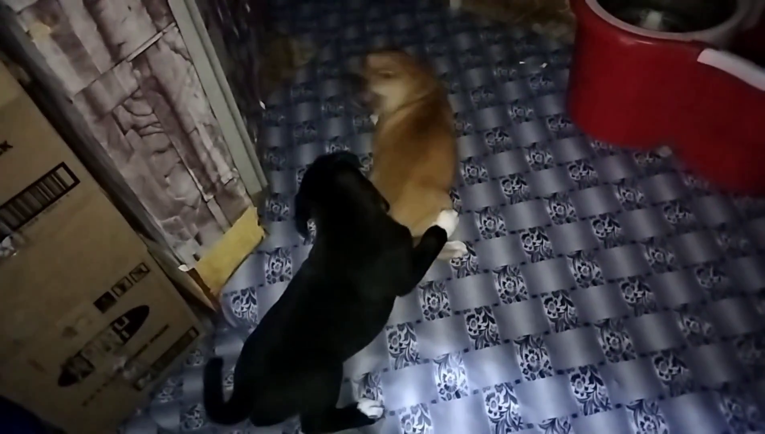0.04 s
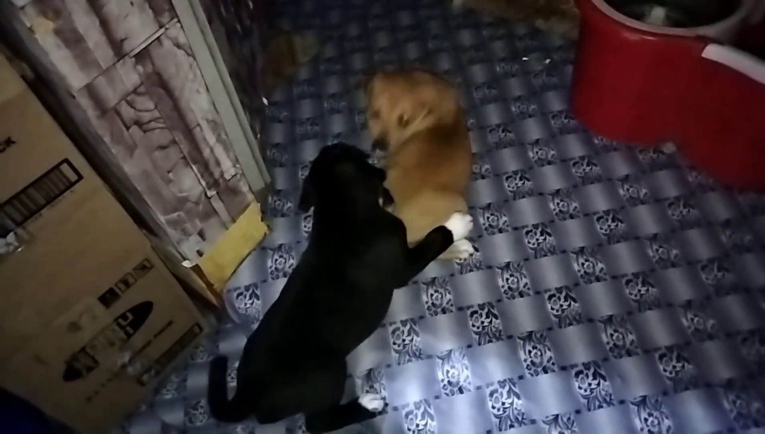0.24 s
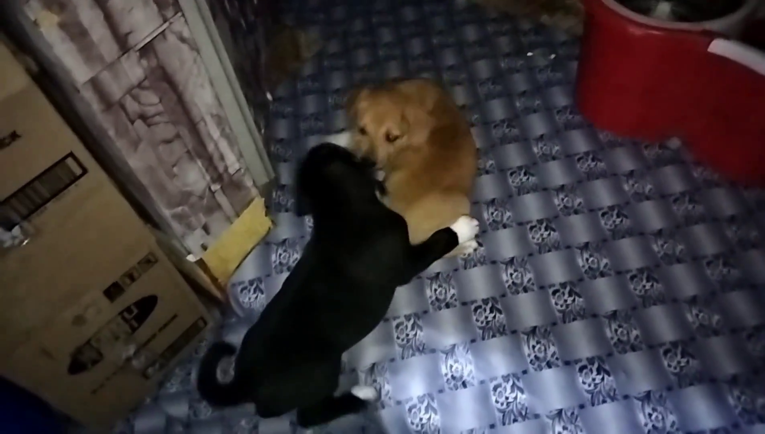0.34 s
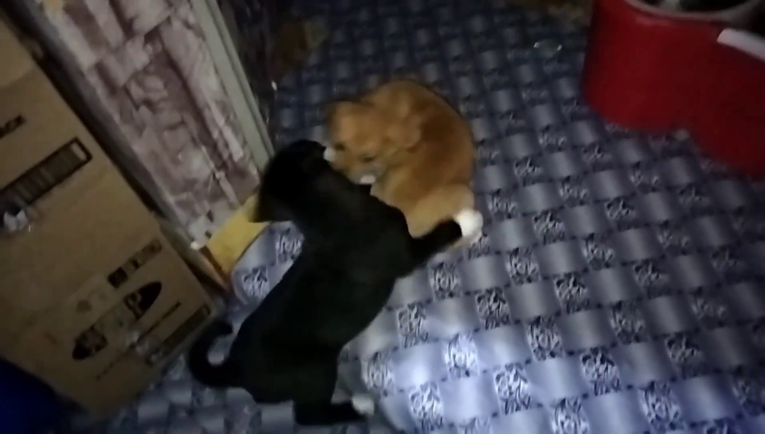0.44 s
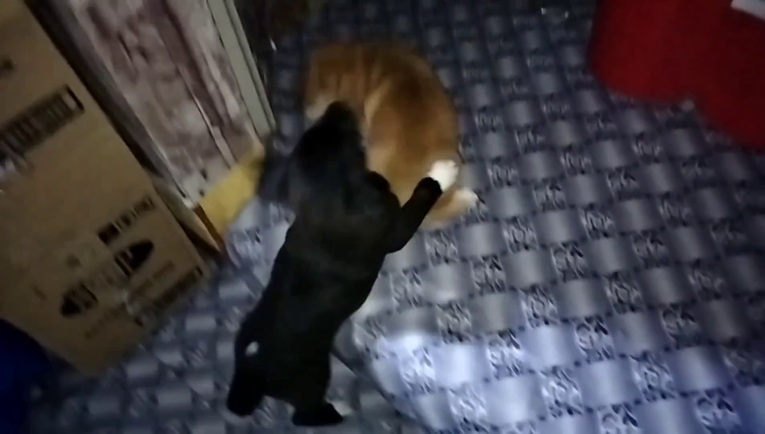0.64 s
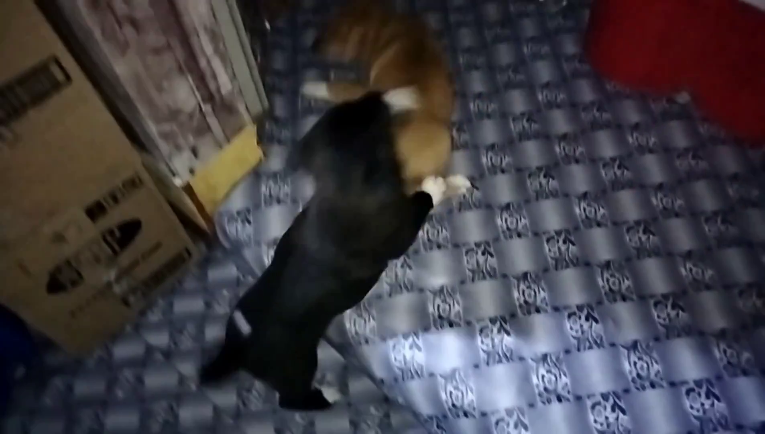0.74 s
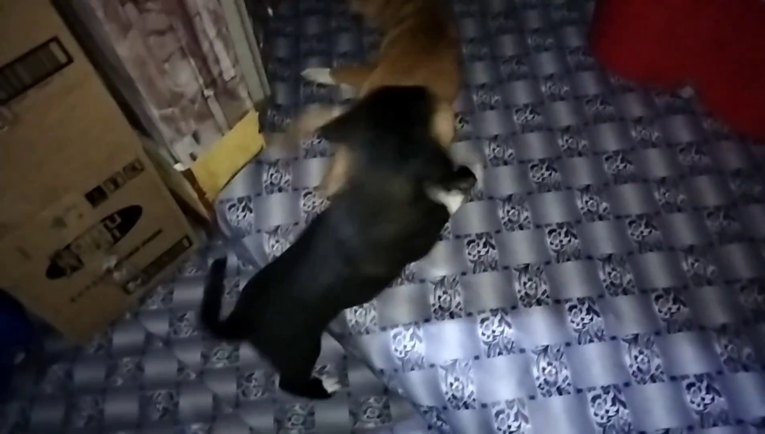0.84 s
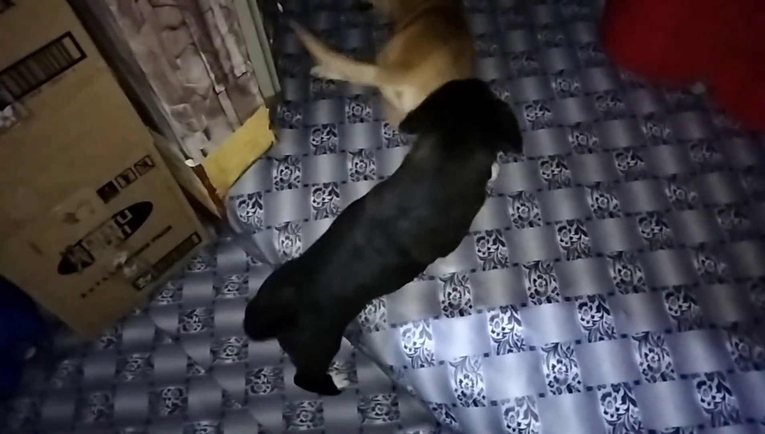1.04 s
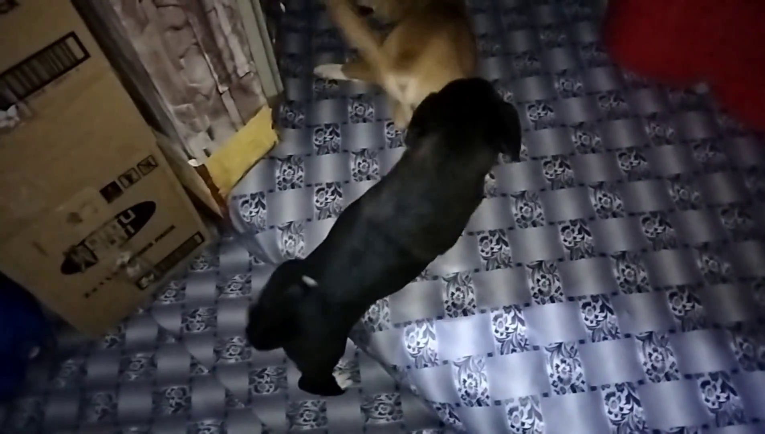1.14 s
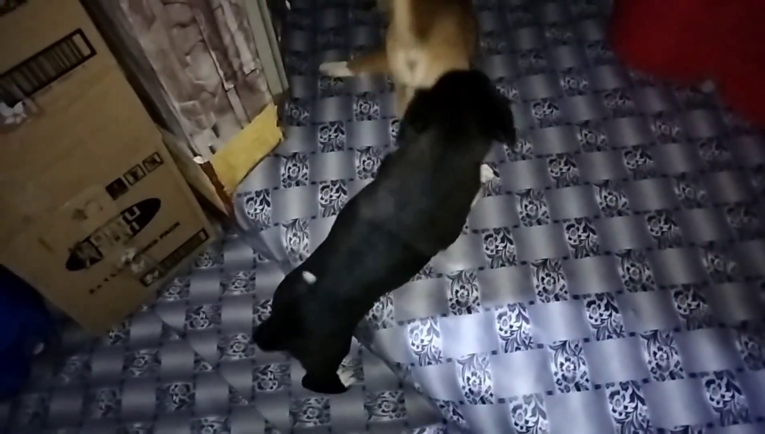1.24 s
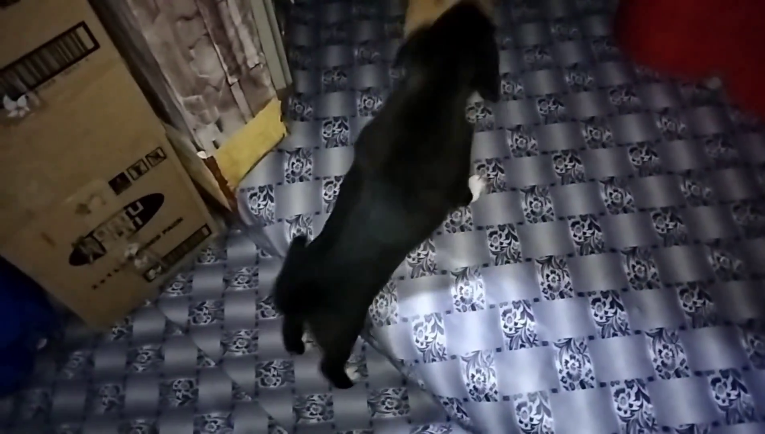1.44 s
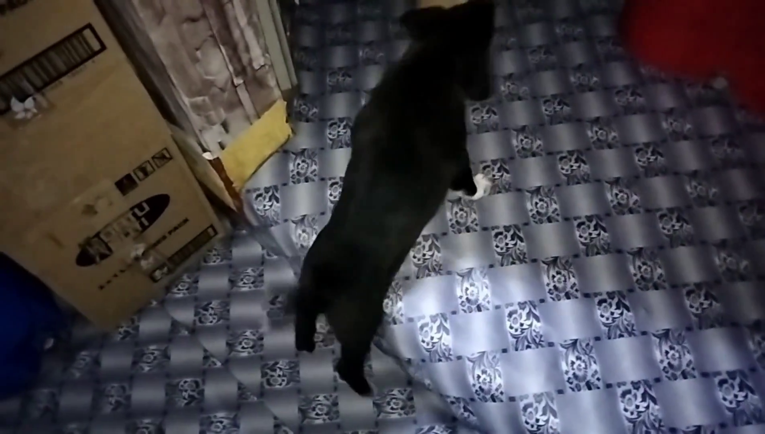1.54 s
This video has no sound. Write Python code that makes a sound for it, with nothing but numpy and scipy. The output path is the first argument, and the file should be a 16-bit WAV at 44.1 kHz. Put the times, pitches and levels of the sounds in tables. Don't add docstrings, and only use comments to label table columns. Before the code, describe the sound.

A dog's sharp hoarse yip bursts out at 0.2 s, rising into a squeak and gone by 0.33 s. A quick snort leads into a low, rattling growl from 0.5 to 0.8 s with wet throat clicks. A small grunt and puffs follow at 0.85 s, then a softer fluttering growl at 1.0-1.25 s. Brief breathy snorts or scuffs come near 1.4 s, over faint room hum, rumble and hiss.

```python
import sys
import numpy as np
from scipy import signal
from scipy.fft import rfft, irfft, next_fast_len
from scipy.io import wavfile
from scipy.ndimage import map_coordinates

SR = 44100
rng = np.random.default_rng(int(sys.argv[2]) if len(sys.argv) > 2 else 0)


def magnitude_from_level(level_db):
    exponent = np.asarray(level_db, float) / 20
    return 10 ** exponent


def bounce(signal):
    frames = np.transpose(np.atleast_2d(signal))
    limited = np.clip(frames, -1, 1)
    pcm = np.round(limited * 32767).astype(np.int16)
    wavfile.write(sys.argv[1], SR, pcm)


N = 70560
T = np.arange(N) / SR

# frequency in Hz, rms level in dB.
HUM_PARTIALS = [(59.5, -60), (119.5, -62.5)]
# time in seconds, level in dB.
RUMBLE_LEVEL = [(0, -59), (.45, -52.5), (.6, -49), (1, -53), (1.4, -51.5), (1.6, -63)]
# frequency in Hz, density in dB per Hz.
RUMBLE_SPECTRUM = [(10, 0.5), (25, -18), (45, 0.5), (100, -17), (200, -57), (400, -55)]
HISS_SPECTRUM = [(60, -8.5), (130, 0), (800, -5), (2700, -13), (5400, -22), (8000, -15), (10000, -22),
                 (12400, -45)]
# frequency in Hz, t60 in seconds.
ROOM_DECAY = [(200, 0.17), (1000, 0.22), (2500, 0.31), (5000, 0.1), (10000, 0.19)]
# frequency in Hz, gain in dB.
MIC_RESPONSE = [(30, -1), (9800, 0), (11000, -3.5), (12400, -7.5)]
# start in seconds, length in seconds, level in dB, low band in dB.
SNORT_PUFFS = [(0, 0.011, -59.5, -2), (0.354, 0.025, -59.5, 5), (0.4216, 0.0039, -52, -0.5),
               (0.487, 0.012, -45, -7.5), (0.505, 0.0096, -42, -11.5), (0.52, 0.015, -56.5, 5.5),
               (0.83, 0.0016, -48.5, -6), (0.834, 0.021, -55, -3.5), (0.868, 0.026, -47.5, -0.5),
               (0.888, 0.059, -50, -5), (0.956, 0.032, -50, -9), (1.333, 0.0074, -58, -6),
               (1.44, 0.027, -68, 3), (1.514, 0.007, -62, 1), (1.551, 0.0093, -59.5, -6),
               (1.563, 0.014, -57.5, -2.5)]
# start in seconds, length in seconds, level in dB, low band in dB.
SWELLING_PUFFS = [
    (1.358, 0.027, -43.5, -16.5),
    (1.39, 0.016, -50, -2.5),
    (1.404, 0.018, -40.5, -11.5),
]
# frequency in Hz, width in Hz, level in dB.
NOSE_HIGH_BAND = [(6750, 1880, -6), (8100, 1220, -1.5), (9440, 1080, 0.5)]
NOSE_LOW_BAND = [(1210, 1660, -2.5), (2950, 1400, -6), (4060, 860, 4.5)]
# time in seconds, peak in dB, pitch in Hz, t60 in seconds.
PALATE_SLAPS = [(.555, -36, 1090, .04), (0.5895, -27.5, 1290, .015), (0.599, -31, 1310, 0.011),
                (.6, -40, 6150, .01), (0.614, -34, 6300, 0.0083), (0.6588, -30, 1260, 0.016),
                (.671, -35, 1370, .02), (.681, -21.5, 1300, 0.013), (.681, -28.5, 6660, 0.014),
                (0.6939, -21.5, 1116, 0.02), (0.7042, -22, 1350, 0.014), (0.7107, -24.5, 1413, 0.023),
                (0.71, -22.5, 6930, .01), (0.729, -29, 1114, 0.031), (0.8418, -42.5, 1450, 0.03),
                (.8725, -39.5, 3970, 0.032), (.888, -31.5, 9200, 0.0087), (1.0171, -39.5, 1500, 0.023),
                (1.051, -39.5, 1500, 0.025), (1.124, -39, 1320, 0.019), (1.146, -35.5, 1522, 0.027),
                (1.146, -39, 3950, 0.017), (1.183, -35, 1450, .018), (1.201, -48, 1500, .015),
                (1.203, -52, 3950, 0.014)]
# time in seconds, pitch in Hz, level in dB.
CHEST_TONE_1 = [(.52, 180.9, -53), (.552, 213.4, -46.5), (.58, 215.3, -47), (.62, 202, -53),
                (.658, 220.1, -46), (.7, 223, -46), (.725, 224.5, -57)]
CHEST_TONE_2 = [(1.005, 165, -60), (1.028, 172, -50), (1.048, 178, -49), (1.088, 192, -51),
                (1.118, 195, -47), (1.16, 196, -51), (1.212, 191, -52), (1.235, 190, -61)]
# time in seconds, level in dB, pitch in Hz, roughness from 0 to 1.
FIRST_GROWL = [(.515, -48.5, 180.3, 0.47), (.532, -39.5, 201.4, 0.09), (.556, -35.5, 212.6, 0.52),
               (.6, -36.5, 215, 0.77), (.636, -37, 179.7, 0.55), (.68, -35, 190, 0.46),
               (.73, -36.5, 204.8, 0.43), (.775, -42, 171.9, 0.76), (.8, -58.5, 166, 0.68)]
SECOND_GROWL = [(.995, -49, 174.6, 0.42), (1.02, -46.5, 179.6, 1), (1.056, -42, 190, 0.66),
                (1.12, -41, 201.5, 0.33), (1.182, -42.5, 215, 0.39), (1.215, -42.5, 214, 0.33),
                (1.235, -51, 202.9, 1), (1.26, -59, 190, 0.97)]
GRUNT_BETWEEN = [
    (.834, -60, 171.3, 0.57),
    (.84, -42.5, 174.8, 0.97),
    (.855, -51.5, 166, 0.57),
    (.875, -50, 172.8, 0.48),
    (.93, -53, 167, 0.85),
    (.99, -52.5, 173.3, 0.64),
    (1.0, -41, 169, 0.62),
]
# start in Hz, end in Hz, width in Hz, level in dB, change in dB.
FIRST_THROAT = [(215, 250, 160, 0, -12.5), (410, 350, 190, -4.5, 10.5), (650, 485, 260, -0.5, -13.5),
                (1090, 960, 210, -1.5, 1.5), (1105, 1543, 163, 5.5, -3.5), (1500, 1570, 300, -8, 8),
                (2790, 2850, 510, -3.5, -15.5), (3680, 3500, 480, -7.5, -1.5), (4130, 4500, 1930, -17, 1.5),
                (6300, 6800, 370, -18, 18.5), (8000, 8530, 1170, -16.5, 7)]
SECOND_THROAT = [(371, 233, 138, 3, 1.5), (600, 385, 427, -4, 5.5), (1450, 1690, 450, -6.5, 3),
                 (3020, 2720, 940, -8.5, -0.5), (3950, 3930, 260, -14, 13.5),
                 (4440, 4400, 610, -21.5, 10.5), (7240, 7800, 1020, -17.5, 11),
                 (8840, 9700, 1000, -10.5, -6)]
GRUNT_THROAT = [(190, 185, 160, 0.5, 0), (320, 316, 110, 6.5, 5.5), (1470, 1840, 370, 2.5, -7),
                (2964, 4400, 1100, -7.5, -11)]
# time in seconds, level in dB, squeak pitch in Hz, squeak share in dB.
YIP_COURSE = [
    (0.1888, -50, 1500, -8),
    (0.1922, -38, 1488, -0.5),
    (0.205, -29.5, 1539, -26),
    (0.209, -24, 1496, -12),
    (.224, -20, 1658, -2.5),
    (0.237, -18.5, 1974, 0.5),
    (0.264, -19.5, 1975, -4),
    (0.284, -25.5, 2150, -17),
    (0.33, -49, 2150, -25),
]
# start in Hz, end in Hz, width in Hz, level in dB, change in dB.
YIP_RESONANCES = [(224, 260, 120, -14.5, -12), (380, 426, 75, -6, 13), (700, 776, 77, -23, -37),
                  (1340, 1740, 820, -1, 5), (1860, 2090, 324, 6, -1), (3180, 2350, 460, 1, 4),
                  (3580, 3210, 260, -0.5, -1), (3730, 4250, 770, -3, 0.5), (6060, 8080, 1230, -22, 18.5),
                  (9200, 11100, 850, 1.5, -29)]
# frequency in Hz, gain in dB.
YIP_LOW_CUT = [(50, -18), (250, -10.5), (720, -6.5), (950, -9), (1250, -4)]
# time in seconds, boost in dB.
FOLD_JOLTS = [(.2075, 5), (.2255, 7), (.234, 5), (.241, 5), (.2495, 5), (.255, 4), (.2605, 6), (.267, 2)]


def unit(x):
    return x / np.sqrt(np.mean(x ** 2) + 1e-20)


def along(points, hz):
    f, v = np.transpose(points)
    return np.interp(np.log(hz + 1), np.log(f + 1), v)


def curves(rows):
    s, *columns = np.transpose(rows)
    return [np.interp(T, s, column) for column in columns]


def wobble(rate_hz):
    knots = rng.standard_normal(int(N * 1000 / SR) + 4)
    return map_coordinates(knots, [T * rate_hz])


def coloured(x, points):
    size = next_fast_len(N + 8192)
    gain = magnitude_from_level(along(points, np.fft.rfftfreq(size, 1 / SR)))
    return irfft(rfft(x, size) * gain, size)[..., :N]


def shaped(x, level_db, rows):
    on = (T > rows[0][0]) & (T < rows[-1][0])
    return on * magnitude_from_level(level_db) * x / np.sqrt(np.mean(x[on] ** 2))


def throat(x, resonances, start_s, end_s):
    part = (T > start_s - 0.02) & (T < end_s + 0.06)
    glide = np.clip((T[part] - start_s) / (end_s - start_s), 0, 1)
    out = np.zeros(N)
    for k, (from_hz, to_hz, width_hz, db, change_db) in enumerate(resonances):
        turn = np.exp(2j * np.pi * np.cumsum(from_hz + (to_hz - from_hz) * glide) / SR)
        pole = np.exp(-np.pi * width_hz * 1.5 / SR)
        smooth = signal.lfilter([(1 - pole) ** 2], [1, -2 * pole, pole ** 2], x[part] / turn)
        out[part] += (-1) ** k * magnitude_from_level(db + change_db * glide) * (smooth * turn).real
    return out


def folds(pitch_hz, rough, jitter, top_hz, weak=1, scatter_db=0.5, flutter_db=0, gate=2.85):
    cycles = np.cumsum(pitch_hz * (1 + jitter * wobble(150))) / SR
    whole = np.floor(cycles).astype(int)
    scatter = magnitude_from_level(scatter_db * np.clip(rng.standard_normal(2000), -2, 2))
    size = scatter[whole] * np.where(whole % 2, weak, 1)
    clicks = unit(np.diff(whole, prepend=0) * size)
    pulses = signal.lfilter(*signal.butter(3, top_hz, fs=SR), clicks)
    breath = unit(size * magnitude_from_level(flutter_db) * np.exp(-gate * (cycles % 1)) * rng.standard_normal(N))
    rough = np.clip(rough, 0, 1)
    return np.sqrt(1 - rough) * pulses + np.sqrt(rough) * breath, cycles


def hum():
    out = np.zeros(N)
    for hz, db in HUM_PARTIALS:
        level = magnitude_from_level(db + 4.5 + 1.3 * wobble(6.94))
        out += level * np.sin(2 * np.pi * hz * T + 0.68 * wobble(4.72))
    return out


def rumble():
    level_db = curves(RUMBLE_LEVEL)[0] - 1 + 0.42 * wobble(29.6)
    return magnitude_from_level(level_db) * unit(coloured(rng.standard_normal(N), RUMBLE_SPECTRUM))


def hiss():
    level_db = -55.5 + 0.8 * wobble(22.07)
    return magnitude_from_level(level_db) * unit(coloured(rng.standard_normal(N), HISS_SPECTRUM))


def room(x):
    wall_delay_s = 0.006
    hz, t, z = signal.stft(rng.standard_normal(SR // 2), SR, nperseg=256)
    decay = magnitude_from_level(-60 * t / along(ROOM_DECAY, hz)[:, None])
    tail = signal.istft(z * decay, SR, nperseg=256)[1]
    delayed = np.pad(x, (round(wall_delay_s * SR), 0))
    return signal.fftconvolve(delayed, tail / np.linalg.norm(tail))[:N]


def nose(air, band):
    still = [(hz, hz, width_hz, db, 0) for hz, width_hz, db in band]
    return unit(throat(air, still, 0, 2))


def snorts():
    rise_s, fall_s, grain_db = 0.0068, 0.0073, -2
    puffs = [(*row, min(rise_s, row[1] / 6)) for row in SNORT_PUFFS]
    puffs += [(*row, 0.7 * row[1]) for row in SWELLING_PUFFS]
    high_power, low_power = np.zeros(N), np.zeros(N)
    for start_s, length_s, db, low_db, puff_rise_s in puffs:
        rise = np.clip((T - start_s) / puff_rise_s, 0, 1)
        fall = np.exp(-np.maximum(T - start_s - length_s, 0) / min(fall_s, length_s))
        env = magnitude_from_level(db) * rise * fall
        high_power += env ** 2
        low_power += (env * magnitude_from_level(low_db)) ** 2
    air = rng.standard_normal((2, N)) * magnitude_from_level(grain_db * wobble(520))
    high = np.sqrt(high_power) * nose(air[0], NOSE_HIGH_BAND)
    return high + np.sqrt(low_power) * nose(air[1], NOSE_LOW_BAND)


def slaps():
    rise_s = 0.0008
    out, t = np.zeros(N), T[:SR // 20]
    waver = 1 + 0.05 * wobble(500)
    for start_s, db, hz, t60_s in PALATE_SLAPS:
        i = round(start_s * SR)
        ring = slice(i, i + len(t))
        env = magnitude_from_level(db + 3 - 60 * t / t60_s) * (1 - np.exp(-t / rise_s))
        out[ring] += env * np.sin(2 * np.pi * hz * np.cumsum(waver[ring]) / SR)
    return out


def chest(rows):
    pitch_hz, level_db = curves(rows)
    phase = 2 * np.pi * np.cumsum(pitch_hz * (1 + 0.015 * wobble(60))) / SR
    octave = magnitude_from_level(-5 + 4.1 * wobble(41.6)) * np.sin(2 * phase)
    return shaped(np.sin(phase) + octave, level_db + 0.5 + 1.9 * wobble(50.8), rows)


def growl(rows, resonances, flutter_hz, depth_db, peak_s):
    level_db, pitch_hz, rough = curves(rows)
    flutter_phase = 2 * np.pi * flutter_hz * (T - peak_s) + 0.7 * wobble(30.23)
    flutter_db = depth_db * np.cos(flutter_phase)
    source, _ = folds(pitch_hz, rough, jitter=0.07 * rough, top_hz=1600, flutter_db=flutter_db, gate=0.78)
    source = source * magnitude_from_level(0.15 * flutter_db)
    return shaped(throat(source, resonances, rows[0][0], rows[-1][0]), level_db, rows)


def fold_jolts():
    rise_s, fall_s = 0.0008, 0.0025
    boost_db = np.zeros(N)
    for start_s, db in FOLD_JOLTS:
        after = np.maximum(T - start_s, 0)
        boost_db += db * (1 - np.exp(-after / rise_s)) * np.exp(-(after / fall_s) ** 2 / 2)
    return magnitude_from_level(boost_db)


def yip():
    folds_hz, squeak_depth, squeak_octave_db = 359, 0.36, -9
    level_db, squeak_hz, share_db = curves(YIP_COURSE)
    jolt = fold_jolts()
    source, cycles = folds(np.full(N, 2.0 * folds_hz), 0.47, jitter=0.025, top_hz=4400,
                           weak=0.6, scatter_db=1.5, gate=1.9)
    hoarse = coloured(throat(source * jolt, YIP_RESONANCES, 0.208, 0.29), YIP_LOW_CUT)
    phase = 2 * np.pi * np.cumsum(squeak_hz * (1 + 0.012 * wobble(202.5))) / SR
    squeak = np.sin(phase) + magnitude_from_level(squeak_octave_db) * np.sin(2 * phase)
    squeak = squeak * (1 + squeak_depth * np.cos(2 * np.pi * cycles))
    squeak = squeak * np.sqrt(jolt) * magnitude_from_level(2.9 * wobble(122.9))
    return shaped(hoarse, level_db - 2.0, YIP_COURSE), shaped(squeak, level_db + share_db, YIP_COURSE)


def scene():
    room_db, squeak_wet_db = -8.5, -9
    background = hum() + rumble() + hiss()
    soft = snorts() + slaps() + chest(CHEST_TONE_1) + chest(CHEST_TONE_2)
    soft += growl(FIRST_GROWL, FIRST_THROAT, flutter_hz=63, depth_db=2.5, peak_s=0.683)
    soft += growl(GRUNT_BETWEEN, GRUNT_THROAT, flutter_hz=63, depth_db=2.5, peak_s=0.683)
    soft += growl(SECOND_GROWL, SECOND_THROAT, flutter_hz=54, depth_db=3.8, peak_s=1.147)
    hoarse, squeak = yip()
    answer = room(hoarse + magnitude_from_level(squeak_wet_db) * squeak) + room(soft)
    return (background + soft + hoarse + squeak + magnitude_from_level(room_db) * answer)[None]


def roll_off(x):
    return signal.sosfilt(signal.butter(12, 12530, fs=SR, output="sos"), x)


def record(dry):
    top_hz = 12550
    band_limit = [(top_hz, -22), (top_hz + 40, -120)]
    return roll_off(coloured(dry, MIC_RESPONSE + band_limit))


dry = scene()
out = record(dry)
bounce(out)
```